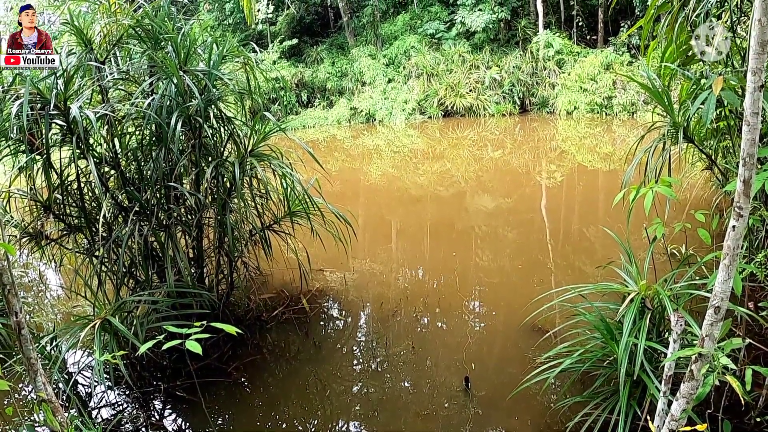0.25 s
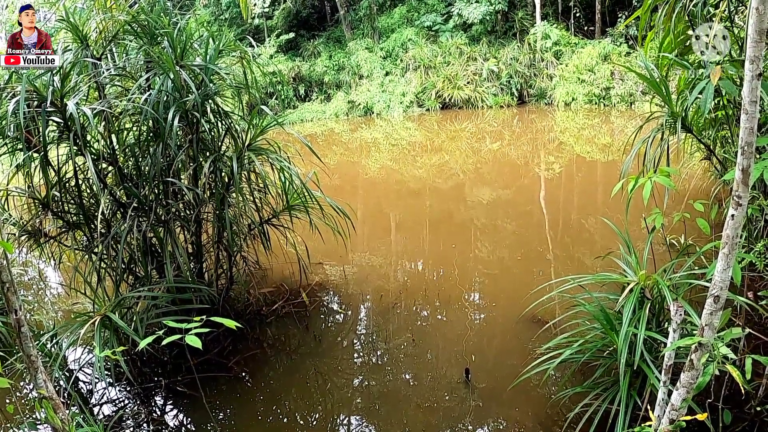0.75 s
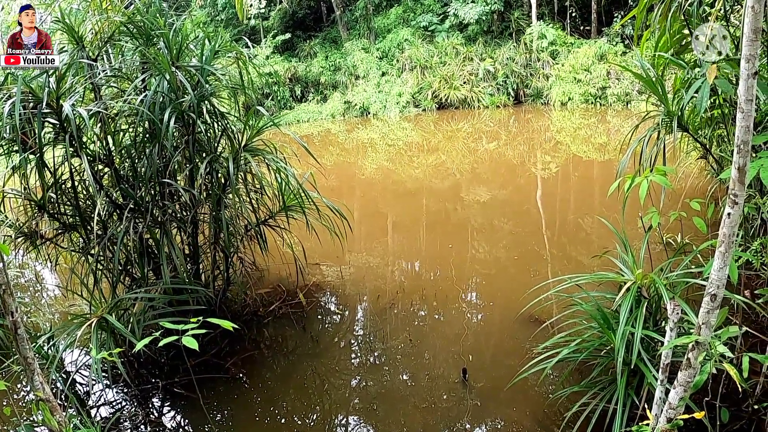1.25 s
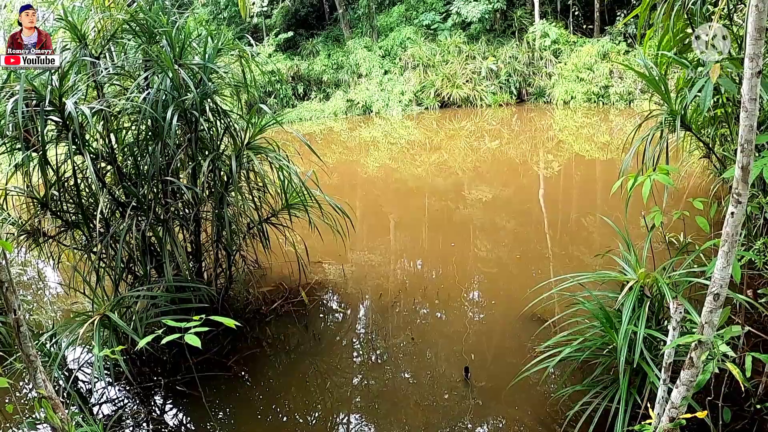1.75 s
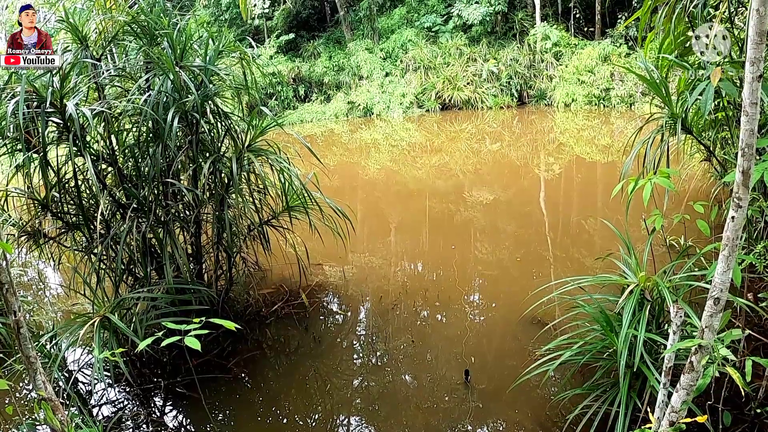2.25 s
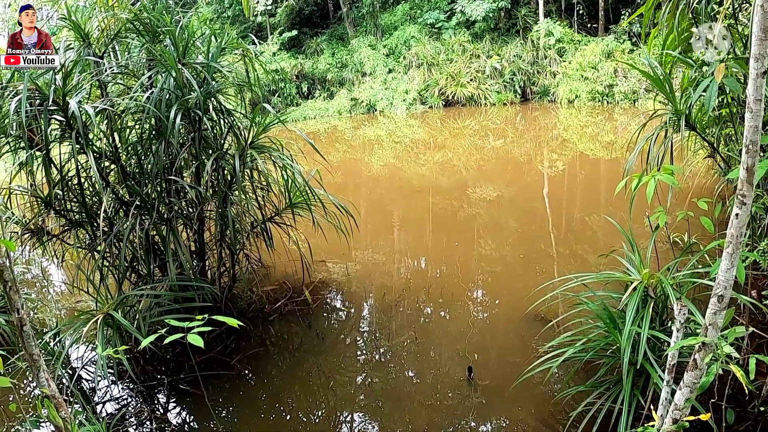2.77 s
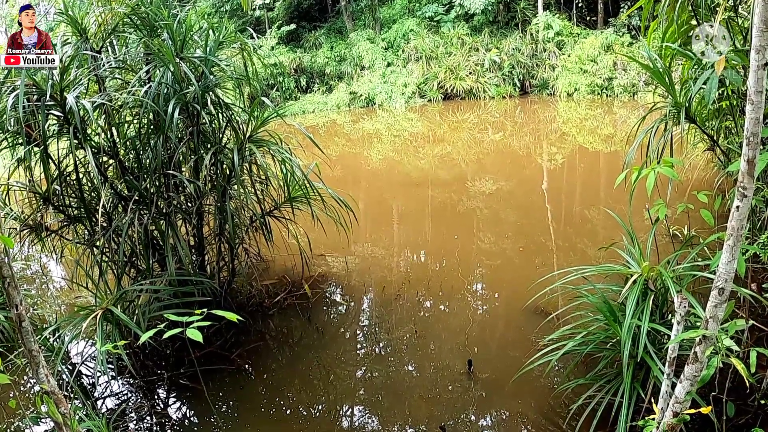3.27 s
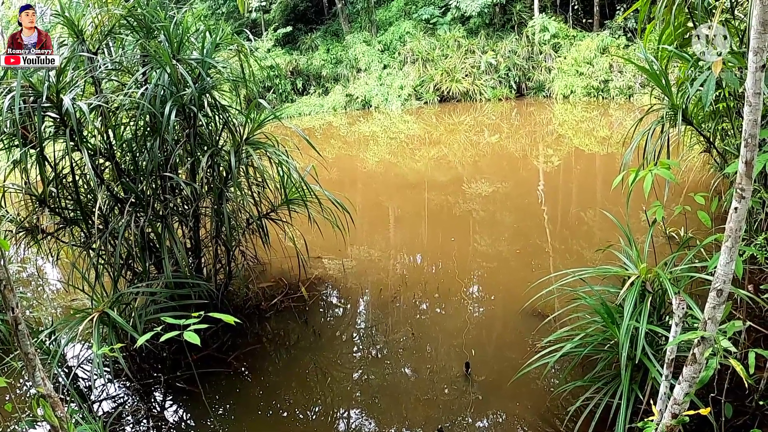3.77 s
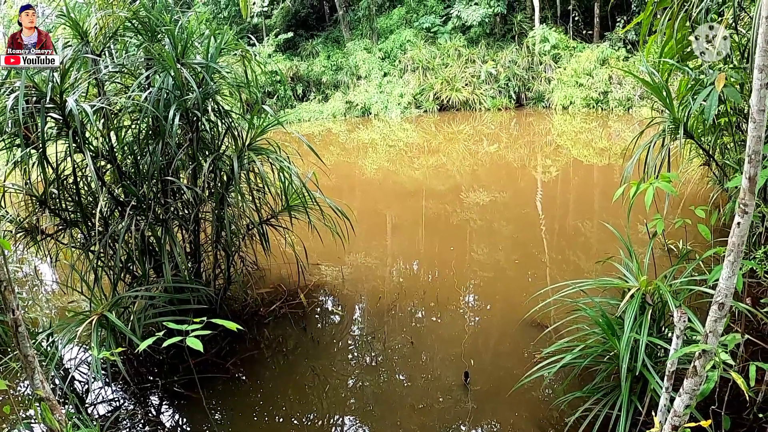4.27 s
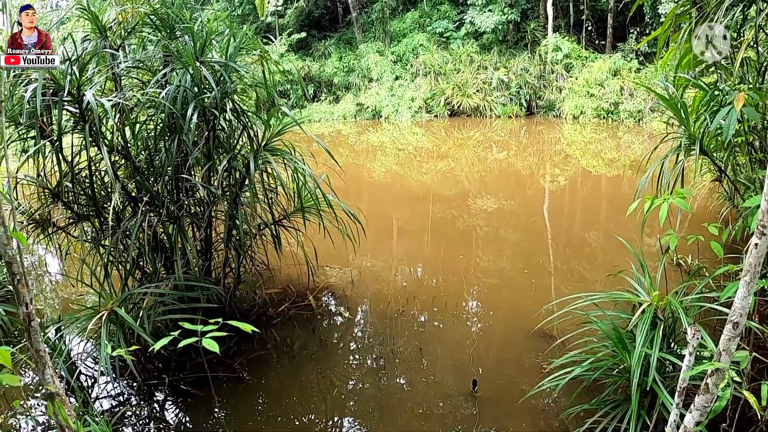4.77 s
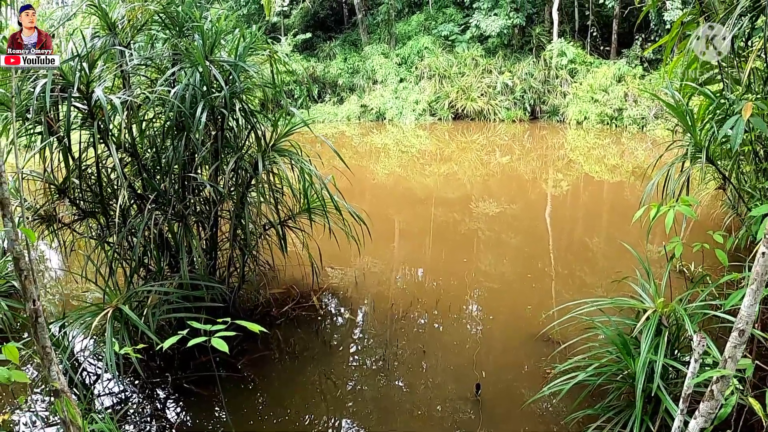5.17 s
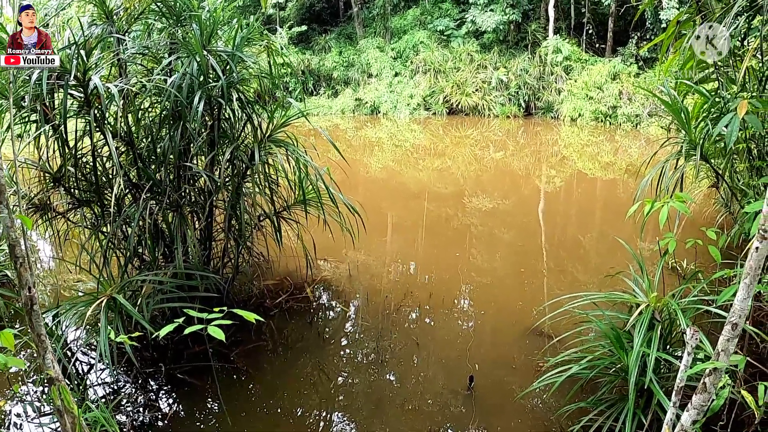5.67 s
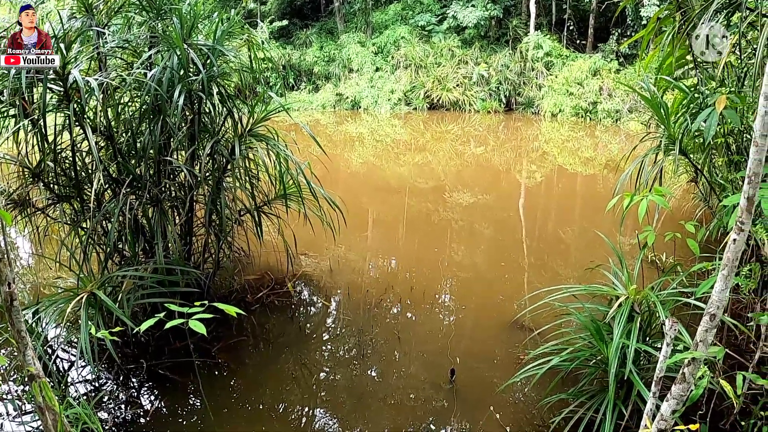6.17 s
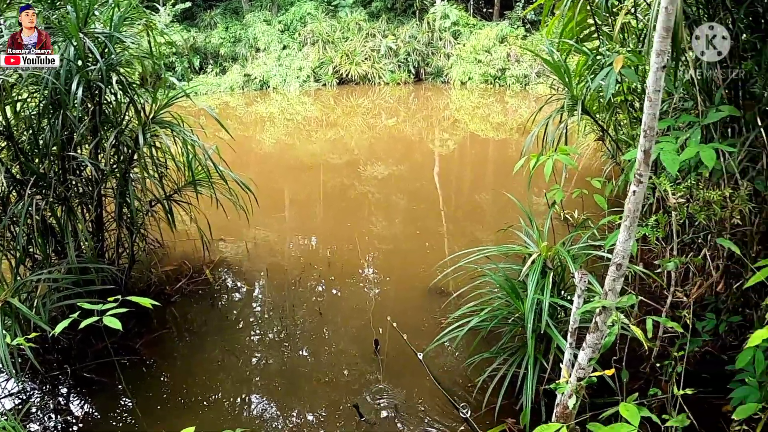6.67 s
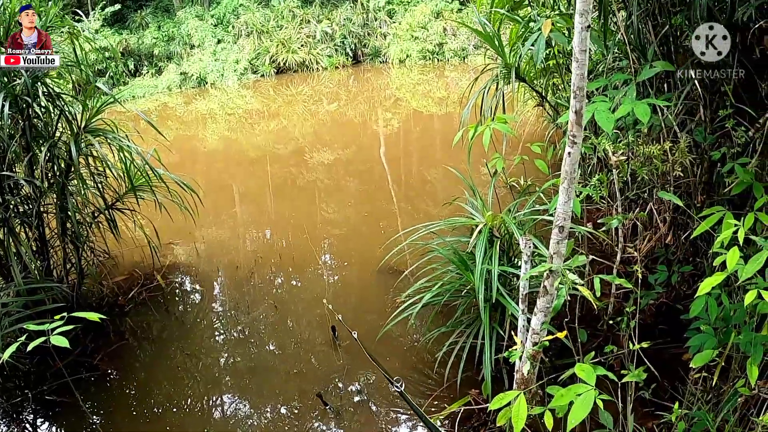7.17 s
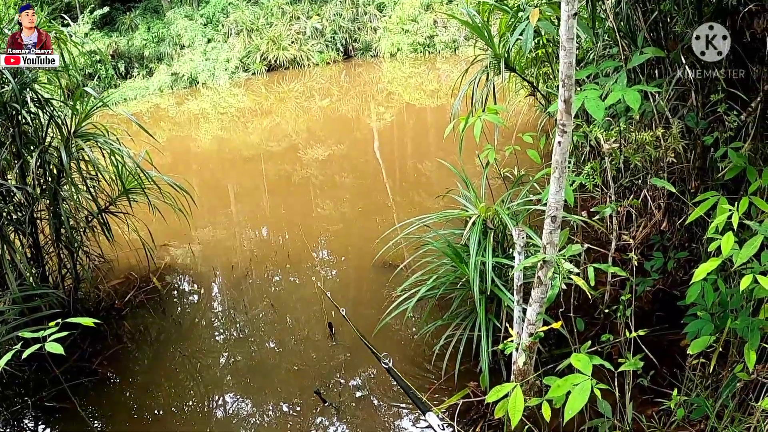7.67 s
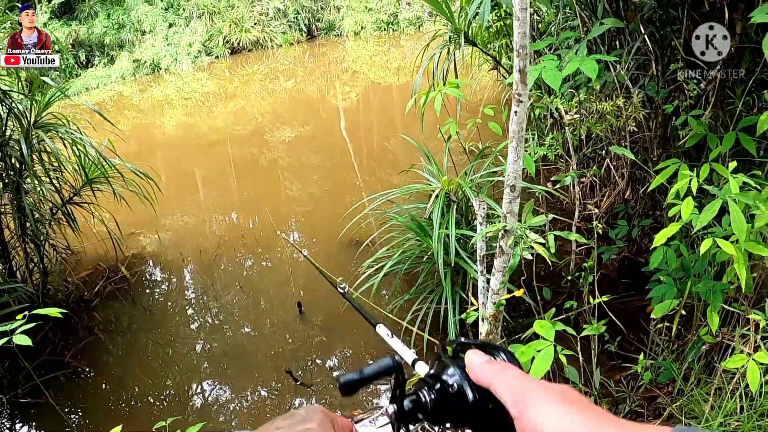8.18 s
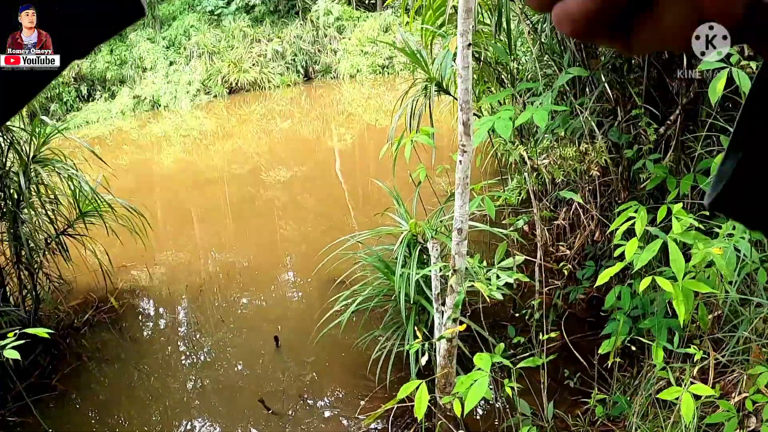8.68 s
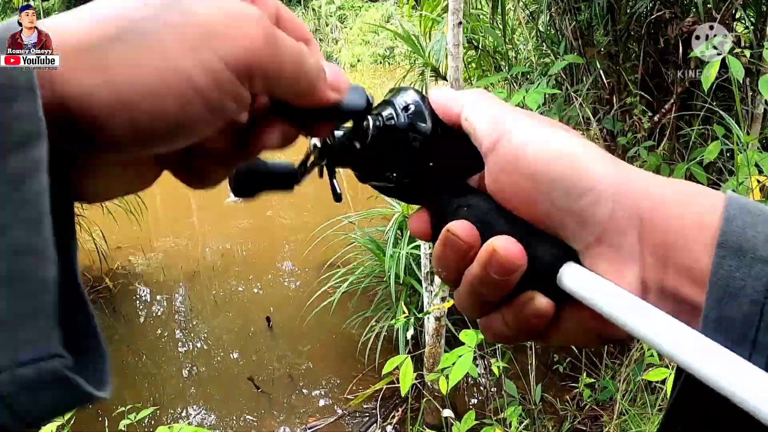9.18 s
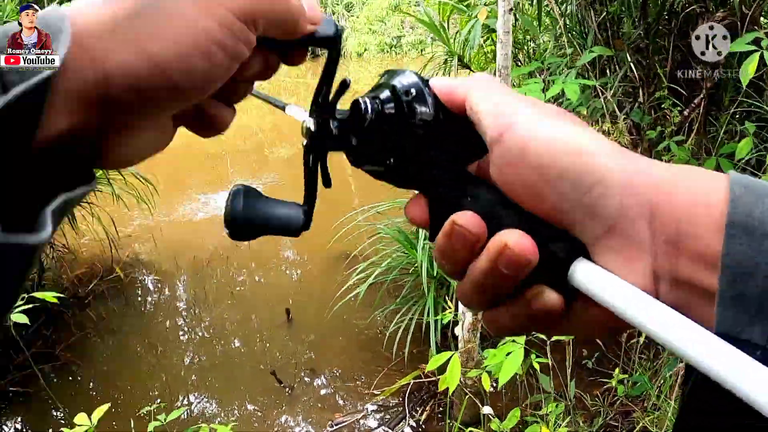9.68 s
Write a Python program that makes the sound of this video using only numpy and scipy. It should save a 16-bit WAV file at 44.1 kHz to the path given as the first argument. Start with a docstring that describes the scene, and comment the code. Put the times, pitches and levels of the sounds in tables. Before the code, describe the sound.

Throughout, crickets and bush crickets shrill in a continuous, very high chorus, pure pulsing tones and fine hiss spread wide over soft forest air. From 0.2 to 1.1 s faint gliding whistles and short squeaks sound nearby, with a light rustle. Between 1.1 and 2 s steps brush and snap dry twigs, the sharpest at 1.9 s on the left. Soft hissing swells and wavering tones echo faintly until about 4 s. Squeaks slow into tiny rattles at 4.6-5.2 s; rustling follows around 6.3 s, a third squeaky run at 6.9-7.5 s, and a twig snap at 7.4 s. From 8.2 s a reel runs quietly with small clicks. At 8.75 s the line is cast, whirring and swishing until 9.3 s; then winding surges close up, with loud sharp clicks, rubbing sleeves, low handling rumble and gulping, bubbling water to the end.

```python
"""Forest pond with a cast line

Crickets and bush crickets shrill without pause in the vegetation round a forest pond: pure tones and noise bands.
Nearby, a few thin gliding whistles and three runs of short squeaks, which are slowing pulse trains that ring resonances.
Soft hissing swells and thin wavering tones come and go in a long echo.
Rustles, dull thumps and a short scrape are made of noise grains; an angler's steps snap twigs.
At the end a line is cast and wound in close to the microphone: the spool whirrs through its housing,
sleeves rub, the reel clicks sharply and the lure gurgles with gliding gulps and clouds of bubbles."""
import sys
import numpy as np
from scipy import signal
from scipy.fft import rfft, irfft, next_fast_len
from scipy.io import wavfile
from scipy.ndimage import map_coordinates

SR = 44100
rng = np.random.default_rng(int(sys.argv[2]) if len(sys.argv) > 2 else 0)


def digitize_waveform(pressure):
    """Quantize a signal to 16-bit integers and store it at the path in sys.argv[1].

    Rows of a 2-D input are taken as channels; values are limited to [-1, 1].
    """
    field = np.atleast_2d(pressure).T
    bounded = np.clip(field, -1, 1)
    quanta = np.round(bounded * 32767).astype(np.int16)
    wavfile.write(sys.argv[1], SR, quanta)


N = 437913
TIME = np.arange(N) / SR


def from_db(db):
    """Decibels to gain."""
    return 10 ** (np.asarray(db) / 20)


def rms_one(x):
    """Scale to unit power."""
    return x / np.sqrt(np.mean(x ** 2) + 1e-20)


def in_time(rows):
    """Columns of a curve table, interpolated at every sample."""
    s, *columns = np.transpose(rows)
    return [np.interp(TIME, s, column) for column in columns]


def during(rows, fade_s=0.048):
    """Fade in from the first row of a curve table."""
    return np.clip((TIME - rows[0][0]) / fade_s, 0, 1)


def held(start_s, end_s, attack_s, release_s):
    """Envelope that rises, holds and has died away at end_s."""
    rise = np.clip((TIME - start_s) / attack_s, 0, 1)
    fall = np.clip((end_s - TIME) / release_s, 0, 1)
    return rise * fall


def swell(length):
    """Time round the middle of a sound and its bell envelope, which spans twice the nominal length."""
    t = np.arange(-length, length, 1 / SR)
    return t, np.cos(np.pi / 2 * t / length) ** 4


def panned(left_db):
    """Gains of the two channels; positive leans left."""
    return from_db(np.array([[.5], [-.5]]) * left_db)


def add(out, sound, s):
    """Mix a sound in from time s, cut at both ends of the scene."""
    at = round(s * SR)
    sound, at = sound[..., max(-at, 0):], max(at, 0)
    out[..., at:at + sound.shape[-1]] += sound[..., :max(N - at, 0)]


def drift(rate, t=TIME):
    """Slow random wander of rms 1, with rate new values per second."""
    knots = rng.standard_normal(8000)
    return rms_one(np.interp((t - t[0]) * rate, np.arange(len(knots)), knots))


def stereo_noise(alike, size=N):
    """White noise whose channels share a part."""
    mid, side = rng.standard_normal((2, size))
    alike = np.clip(alike, 0, 1)
    return np.sqrt((1 + alike) / 2) * mid + np.sqrt((1 - alike) / 2) * np.array([side, -side])


def band(x, low_hz, high_hz, order=2):
    """Butterworth band-pass."""
    edges = [low_hz, min(high_hz, SR * .45)]
    return signal.sosfilt(signal.butter(order, edges, "band", fs=SR, output="sos"), x)


def coloured(x, spectrum):
    """Give a steady sound a spectrum; rms 1."""
    hz, db = np.transpose(spectrum)
    size = next_fast_len(N)
    bins = np.maximum(np.fft.rfftfreq(size, 1 / SR), 1)
    gains = from_db(np.interp(np.log(bins), np.log(hz), db))
    return rms_one(irfft(rfft(x, size) * gains, size)[..., :N])


def resonate(x, modes):
    """Parallel two-pole resonances, with alternating signs."""
    out = 0
    for k, (hz, width, db) in enumerate(modes):
        r = np.exp(-np.pi * width / SR)
        gain = (-1) ** k * from_db(db) * (1 - r * r) / 2
        poles = [1, -2 * r * np.cos(2 * np.pi * hz / SR), r * r]
        out = out + gain * signal.lfilter([1, 0, -1], poles, x)
    return out


def forest(x, t60=0.65, first_s=0.023):
    """Scattering from trunks and leaves: a diffuse tail, different in each ear."""
    t = np.arange(SR) / SR
    tail = rng.standard_normal((2, SR)) * from_db(-60 * t / t60) * (t > first_s)
    tail /= np.sqrt(np.sum(tail ** 2, axis=1, keepdims=True))
    return signal.fftconvolve(np.atleast_2d(x), tail, axes=1)[:, :N]


def glides(rows, waver_hz, flutter_db, waver_rate=160):
    """Brief tones that waver in pitch and level and glide, with the end pitches half a length from the middle."""
    out = np.zeros(N)
    for s, length, start_hz, end_hz, db in rows:
        t, envelope = swell(length)
        hz = start_hz * (end_hz / start_hz) ** (t / length + .5) + waver_hz * drift(waver_rate, t)
        tone = np.sin(2 * np.pi * np.cumsum(hz) / SR) * from_db(flutter_db * drift(70.2, t))
        add(out, from_db(db) * envelope * rms_one(tone), s - length)
    return out


# still forest air all round, relative spectrum: [f/Hz, density level/dB per Hz]
AIR_SPECTRUM = [(25, -17.5), (50, -9.5), (105, -21), (150, 0), (200, -2.5), (300, -7), (650, -15.5),
                (1150, -14), (1700, -17), (2400, -22.5), (4200, -25), (8000, -43.5), (10000, -65.5)]
AIR_DB = -65.5


def forest_air():
    """Wide noise with the colour of still air, its level wavering slightly."""
    return from_db(AIR_DB + .5 * drift(6.4)) * coloured(stereo_noise(0.13), AIR_SPECTRUM)


# farther singers round the pond, the last group a steady hiss:
# [centre f/Hz, width f/Hz, level/dB, left-right level/dB, syllables per s, pulsing depth 0-1]
CHORUS_GROUPS = [(5423, 990, -70.5, 3, 5.3, 0.03), (6790, 480, -72, 6.5, 20, 0.5),
                 (7259, 195, -61.5, 5, 79, 0.12), (7656, 490, -60, -0.5, 25, 0.08),
                 (8200, 246, -67, -7.5, 19.3, 0.34), (8504, 297, -71.5, -7, 120, 0.4),
                 (6700, 920, -71, 0.5, 51, 0)]


def chorus(waver_db=.5, rate_wander=0.0096):
    """Farther singers as blurred noise bands: most groups pulsing at their own rates, one a steady hiss."""
    out = np.zeros((2, N))
    for hz, width, db, left_db, rate, depth in CHORUS_GROUPS:
        cycle = np.cumsum(rate * (1 + rate_wander * drift(1.4))) / SR
        strokes = np.maximum(1 + depth * np.cos(2 * np.pi * cycle), 0)
        wings = band(rng.standard_normal((2, N)), hz - width / 2, hz + width / 2, order=3)
        out += from_db(db + waver_db * drift(3.4)) * panned(left_db) * rms_one(wings * strokes)
    return out


def wing_song(hz, rate, first_s, duty=0.65, waver_hz=7, rough=0.12, wet_db=-13):
    """Each closing of the wings rings one pure tone; the foliage fills the gaps."""
    cycle = ((TIME - first_s) * rate + .5) % 1 - .5
    stroke = np.cos(np.pi * np.clip(cycle / duty, -.5, .5))
    tone = np.sin(2 * np.pi * np.cumsum(hz + waver_hz * drift(40)) / SR)
    song = rms_one(stroke * tone * (1 + rough * drift(300)) * from_db(1.1 * drift(17)))
    return song + from_db(wet_db) * forest(song)


# the nearest cricket, which lies to the left while the microphone is turned away:
# [t/s, level/dB, left-right level/dB]
NEAREST_CRICKET = [(0.0, -62.5, -2.5), (3.0, -59.5, -1), (3.9, -61.5, -6), (4.5, -62.5, 13),
                   (5.1, -60, 11.5), (6.0, -65, 17), (8.2, -62, 8), (8.7, -64, 0)]
# songs of the two near crickets: (wing tone f/Hz, syllables per s, middle of the first syllable t/s)
NEAR_SONG, SECOND_SONG = (7143, 11.955, .012), (7628, 12.71, .055)
SECOND_DB, SECOND_LEFT_DB = -67.5, -5.5


def crickets():
    """Two near crickets sing at slightly different rates; the nearest changes in level and side."""
    level_db, left_db = in_time(NEAREST_CRICKET)
    nearest = from_db(level_db) * panned(left_db) * wing_song(*NEAR_SONG)
    second = from_db(SECOND_DB) * panned(SECOND_LEFT_DB) * wing_song(*SECOND_SONG)
    return nearest + second


# soft hissing swells and thin wavering tones; levels before the direct and echo gains:
# [middle t/s, length t/s, start f/Hz, end f/Hz, level/dB, waver f/Hz]
SOFT_SWELLS = [(0.028, 0.2, 3350, 3250, -73.5, 202), (1.42, 0.34, 4150, 3500, -68, 330),
               (2.05, 0.31, 1011, 919, -69, 90), (2.55, 0.5, 1836, 1780, -73.5, 120),
               (2.679, 0.63, 3190, 3080, -74.5, 169), (3.169, 0.15, 1416, 1200, -69, 111),
               (3.65, 0.6, 1320, 1360, -74, 100), (3.721, 0.65, 3194, 3154, -65.5, 219),
               (6.98, .2, 3650, 3250, -68, 200), (7.276, 0.5, 2910, 2790, -63.5, 140),
               (7.3, 0.85, 4440, 4170, -71, 85), (8.519, 0.41, 3500, 3220, -59, 150)]


def soft_swells(direct_db=-6, wet_db=-1.5):
    """Soft hissing swells and thin wavering tones, blurred by echo."""
    out = np.zeros(N)
    for *tone, waver in SOFT_SWELLS:
        out += glides([tone], waver_hz=waver, flutter_db=3.5, waver_rate=500)
    return from_db(direct_db) * out + from_db(wet_db) * forest(out, t60=0.52)


# thin whistles nearby: [middle t/s, length t/s, start f/Hz, end f/Hz, level/dB]
THIN_WHISTLES = [(.19, 0.15, 1197, 1160, -73.5), (0.41, 0.074, 1800, 1200, -63.5),
                 (0.592, 0.075, 1216, 1205, -61), (0.698, 0.085, 1220, 1195, -62.5),
                 (0.925, 0.1, 1230, 1170, -67), (5.56, 0.25, 1175, 1196, -70)]


def whistles(wet_db=-9):
    """Faint gliding whistles, blurred by the trees."""
    out = glides(THIN_WHISTLES, waver_hz=24, flutter_db=3.0)
    return out + from_db(wet_db) * forest(out)


# squeaks nearby; the pulse rates hold half a length before and after the middle:
# [middle t/s, length t/s, level/dB, first pulse rate f/Hz, last pulse rate f/Hz]
SQUEAK_RUNS = [(0.764, .036, -59.5, 1120, 930), (.958, .024, -58.5, 930, 822),
               (1.13, .018, -54.5, 600, 469), (4.612, 0.027, -61, 1053, 920),
               (4.725, .014, -61, 1230, 1120), (4.779, .023, -51.5, 1250, 620),
               (4.894, .016, -52, 904, 328), (4.942, .016, -47, 900, 331), (5.083, 0.019, -50.5, 697, 251),
               (5.137, .013, -47, 643, 270), (5.150, 0.0084, -49.5, 654, 503),
               (6.894, .022, -54, 1063, 880), (7.012, .016, -54, 1003, 401),
               (7.063, .016, -46.5, 1200, 480), (7.205, .019, -51, 747, 160),
               (7.256, .013, -44.5, 900, 299), (7.31, 0.019, -53.5, 984, 933),
               (7.457, .017, -48.5, 520, 150), (7.526, .023, -49.5, 480, 105)]
# what the squeaks ring with, before sinking and dulling: [f/Hz, width f/Hz, level/dB]
SQUEAK_RESONANCES = [(1090, 220, 4), (1580, 340, 4), (1910, 300, 2), (2480, 390, 0.5), (3100, 420, 1.5)]


def squeaks(sag=0.06, dulling_db=3.5, soft_db=3.5, soft_hz=900, last_pulse=.4, jitter=0.09,
            shimmer_db=2.5, wet_db=-4.0):
    """Pulses slow from a soft tone into a sharp, uneven rattle; their resonances sink and grow duller."""
    out, ring = np.zeros(N), np.arange(SR // 100) / SR
    mode_hz, width, mode_db = np.transpose(SQUEAK_RESONANCES)[:, :, None]
    signs = (-1) ** np.arange(len(mode_hz))[:, None]
    octaves_squared = np.log2(mode_hz / mode_hz[0]) ** 2
    for s, length, db, start_hz, end_hz in SQUEAK_RUNS:
        t, _ = swell(length)
        along = t / length
        rate = start_hz * (end_hz / start_hz) ** (along + .5)
        tonal = np.minimum(rate / soft_hz, 1) ** 2
        cycles = np.cumsum(rate * (1 + jitter * (1 - tonal / 2) * drift(500, t))) / SR
        cycles -= np.interp(last_pulse, along, cycles)  # a pulse falls exactly here
        envelope = np.exp(-np.abs(2 * along) ** 3)
        voice = np.zeros(len(t) + len(ring))
        for i in np.flatnonzero(np.diff(np.floor(cycles))):
            tilt_db = (dulling_db * along[i] + soft_db * tonal[i]) * octaves_squared
            gains = signs * from_db(mode_db - tilt_db + shimmer_db * rng.normal(size=mode_hz.shape))
            sunk_hz = mode_hz * np.exp(-sag * along[i])
            modes = gains * np.exp(-np.pi * width * ring) * np.sin(2 * np.pi * sunk_hz * ring)
            voice[i:i + len(ring)] += envelope[i] * modes.sum(axis=0)
        voice = band(voice, 980, 3900, order=5)
        even_power = np.sqrt(np.sum(envelope ** 2) / np.sum(voice ** 2))
        add(out, from_db(db) * voice * even_power, s - length)
    return out + from_db(wet_db) * forest(out, t60=0.6, first_s=0.0031)


# brushing rustles, dull thumps and a short scrape: [middle t/s, length t/s, level/dB, brightest f/Hz]
RUSTLES = [(0.398, 0.019, -58.5, 440), (0.411, 0.05, -64, 2800), (0.901, 0.17, -67.5, 2120),
           (1.107, 0.012, -53.5, 1150), (1.112, 0.073, -59.5, 2200), (1.786, 0.14, -68, 1750),
           (1.932, 0.089, -55, 1980), (5.275, 0.29, -66.5, 665), (6.3, 0.094, -60.5, 2130),
           (6.343, 0.063, -55.5, 4250), (6.42, 0.16, -63, 2600), (6.73, 0.27, -65.5, 1480),
           (7.1, 0.15, -69, 300), (8.35, 0.26, -61, 1950), (8.623, 0.096, -60, 2900),
           (8.8, 0.022, -43.5, 1920), (9.294, 0.013, -32, 1910)]


def rustles(grain_db=2.5, spread=2.27, top_hz=10000):
    """Brushing rustles, dull thumps and a short scrape, made of clumped noise grains."""
    out, clumps = np.zeros((2, N)), from_db(grain_db * drift(350))
    for s, length, db, hz in RUSTLES:
        t, envelope = swell(length)
        grains = stereo_noise(0.73, size=len(t)) * np.interp(s + t, TIME, clumps)
        rustle = rms_one(band(grains, hz / spread, hz * spread))
        add(out, from_db(db) * envelope * rustle, s - length)
    return band(out, 100, top_hz)


# what a snap rings with, before scatter and damping: [multiple of its ring f, level/dB, t60 t/s]
SNAP_MODES = [(.45, -36, 0.0019), (1, 9, 0.009), (1.132, 5.5, 0.009), (1.48, 10.5, 0.0055),
              (2.1, -10, 0.0053), (2.55, -1, 0.01)]


def snap(hz, damping, crack_db, crack_top_hz, mode_scatter_db=3, ear_scatter_db=3.0):
    """A sudden release: a brief crack and a few quickly dying modes; peak 1."""
    t = np.arange(1024) / SR
    crack = band(stereo_noise(0.095, size=len(t)) * np.exp(-t / 0.0018), 1640, crack_top_hz, order=4)
    out = from_db(crack_db) * panned(-6) * crack
    for multiple, db, t60 in SNAP_MODES:
        ear_db = ear_scatter_db * rng.normal(size=(2, 1))
        strength = from_db(db + mode_scatter_db * rng.normal() + ear_db)
        decay = from_db(-60 * t * damping / t60)
        out = out + strength * np.sin(2 * np.pi * hz * multiple * t) * decay
    # the contact chatters briefly, which flattens the first cycles
    out = band(np.tanh(3.2 * out / np.abs(out).max()), 800, crack_top_hz)
    return out / np.abs(out).max()


# twigs snapping, peak level before panning: [t/s, level/dB, left-right level/dB]
TWIG_SNAPS = [(1.105, -48, 3), (1.528, -48.5, 8), (1.575, -50, 6), (1.755, -50, 8), (1.786, -44.5, 11),
              (1.900, -33.5, 17.5), (1.976, -42, 6), (7.409, -39.5, 2), (7.412, -38.5, 1)]
TWIG_HZ = 1930  # typical ring


def twigs(wet_db=-9):
    """Small dry twigs break underfoot, each snap with its own pitch."""
    out = np.zeros((2, N))
    for s, db, left_db in TWIG_SNAPS:
        hz = TWIG_HZ * np.exp(0.11 * rng.normal())
        twig = snap(hz, damping=1.27, crack_db=-21, crack_top_hz=3820)
        add(out, from_db(db) * panned(left_db) * twig, s)
    return out + from_db(wet_db) * forest(out, t60=0.39)


# sleeves moving by the microphone, rubbing before its lift: [t/s, rubbing level/dB, rumble level/dB]
SLEEVE_MOVES = [(8.72, -58, -65), (8.85, -56.5, -63.5), (9.16, -57, -59.5), (9.27, -53, -65.5),
                (9.4, -48, -48.5), (9.6, -44.5, -45.5), (9.72, -42.5, -57), (9.87, -48, -50),
                (9.93, -53.5, -56)]
# relative spectrum of the rubbing cloth: [f/Hz, density level/dB per Hz]
CLOTH_SPECTRUM = [(100, -14.5), (350, -3.5), (750, -13.5), (1100, 0), (1650, -3.5), (2200, -12),
                  (5000, -12.5), (8500, -21.5), (10000, -22.5), (14000, -30), (15500, -57)]
# relative spectrum of the shaken microphone body: [f/Hz, density level/dB per Hz]
RUMBLE_SPECTRUM = [(20, -1), (55, 3), (90, -2.5), (140, 5), (260, -9), (600, -7), (2000, -64)]


def sleeves(rub_lift_db=3, grain_db=3):
    """Cloth catches and slips in grains, and shakes the microphone's body."""
    rub_db, shake_db = in_time(SLEEVE_MOVES)
    cloth = coloured(stereo_noise(0.67) * from_db(grain_db * drift(220)), CLOTH_SPECTRUM)
    rumble = coloured(stereo_noise(0.93), RUMBLE_SPECTRUM) * panned(-3.5)
    return during(SLEEVE_MOVES) * (from_db(rub_db + rub_lift_db) * cloth + from_db(shake_db) * rumble)


# the rod is swung and the line runs out:
# [middle t/s, length t/s, start f/Hz, end f/Hz, level/dB, waver f/Hz]
ROD_AND_LINE = [(8.362, 0.22, 1500, 1080, -64.5, 170), (8.702, 0.048, 1100, 1700, -67, 90),
                (8.86, .18, 2830, 2730, -52, 70), (9.083, .05, 2620, 2680, -48.5, 170),
                (9.195, .09, 2540, 2660, -51, 120), (9.16, .22, 3320, 3290, -54, 70),
                (8.982, .18, 1130, 1038, -51.5, 45.3), (9.114, 0.051, 1040, 1040, -47, 35),
                (9.129, 0.12, 1520, 1626, -56, 90), (9.195, 0.1, 1460, 1100, -46, 110)]


def line_swishes(wet_db=-12):
    """Rod and line in motion: narrow whines and broad, gliding swishes."""
    out = np.zeros(N)
    for *swish, waver in ROD_AND_LINE:
        out += glides([swish], waver_hz=waver, flutter_db=4, waver_rate=700)
    return out + from_db(wet_db) * forest(out, t60=0.17, first_s=0.0065)


# resonances of the reel's housing: [f/Hz, width f/Hz, level/dB]
HOUSING_MODES = [(1063, 180, -0.5), (1480, 240, -1.5), (2340, 440, -0.5), (2830, 230, 4.5), (3240, 150, 4),
                 (3670, 380, 5), (4170, 620, 1.5), (5400, 670, -34)]
# before the cast the reel runs quietly as the slack is taken up
SLACK_S, SLACK_FADE_S, SLACK_DB = 8.2, 0.2, -62.5
# the cast: the spool spins freely until it is braked
CAST_S, BRAKE_S, SPIN_UP_S, BRAKING_S = 8.748, 9.283, 0.033, 0.055
CAST_DB, CAST_KNOCKS_PER_S = -47, 260
# winding in: the gears surge once in each turn of the handle
WIND_S, FIRST_PUSH_S, TURNS_PER_S = 9.285, 9.31, 3.47
WIND_DB, SURGE_DB, WIND_KNOCKS_PER_S = -49, 5, 420


def reel_gears(friction=0.69, wobble=.2, rattle_db=2.3):
    """Knocks and friction drive the housing: softly at first, evenly in the cast, in surges while winding."""
    slack = from_db(SLACK_DB) * held(SLACK_S, CAST_S + SLACK_FADE_S, SLACK_FADE_S, SLACK_FADE_S)
    cast = from_db(CAST_DB) * held(CAST_S, BRAKE_S, SPIN_UP_S, BRAKING_S)
    push = np.cos(2 * np.pi * TURNS_PER_S * (TIME - FIRST_PUSH_S))
    winding = from_db(WIND_DB + SURGE_DB * push) * np.clip((TIME - WIND_S) / SPIN_UP_S, 0, 1)
    rate = np.where(TIME < WIND_S, CAST_KNOCKS_PER_S, WIND_KNOCKS_PER_S)
    knock_count = np.cumsum(rate * (1 + wobble * drift(170))) / SR
    knocks = np.diff(np.floor(knock_count), prepend=0)
    uneven_knocks = rms_one(knocks * from_db(5.3 * np.tanh(drift(400))))
    drive = uneven_knocks + friction * stereo_noise(0.44)
    whirr = rms_one(band(resonate(drive, HOUSING_MODES), 870, 5400, order=3))
    return (slack + cast + winding) * from_db(rattle_db * drift(110)) * whirr


# clicks of the reel, timed at the catch, peak level: [t/s, level/dB, ring f/Hz]
CATCH_CLICKS = [(8.5295, -35, 3300), (8.603, -40, 2910), (8.64, -42, 3180), (8.762, -32, 3240),
                (8.858, -27.5, 2920), (8.981, -32, 3080), (8.9977, -23, 3540), (9.1438, -16, 3180),
                (9.293, -19, 2930), (9.3327, -18.5, 3050), (9.419, -10, 3180), (9.447, -25, 3050),
                (9.483, -24, 3020), (9.511, -9.5, 3040), (9.5474, -9.5, 3180), (9.6303, -19, 3230),
                (9.661, -24.5, 3560), (9.729, -24, 2780), (9.7445, -11, 2950), (9.771, -26, 3140),
                (9.823, -11, 2940), (9.857, -25, 3120)]


def reel_clicks(wet_db=-17, travel_s=0.00052):
    """The reel's catch snaps right by the microphone, heard after a short travel time."""
    out = np.zeros((2, N))
    for s, db, hz in CATCH_CLICKS:
        click = snap(hz, damping=0.86, crack_db=7.5, crack_top_hz=9150)
        add(out, from_db(db) * click, s + travel_s)
    return out + from_db(wet_db) * forest(out, t60=0.086, first_s=0.004)


# large bubbles gulp behind the lure: [middle t/s, length t/s, start f/Hz, end f/Hz, level/dB]
LURE_GULPS = [(9.363, .036, 520, 289, -39), (9.414, .03, 520, 700, -36), (9.388, 0.02, 1117, 1170, -42),
              (9.43, .03, 1150, 945, -39.5), (9.512, .052, 511, 270, -34.5),
              (9.585, 0.061, 210.3, 479, -40.5), (9.584, .014, 1525, 1680, -33.5),
              (9.63, 0.064, 120, 289, -42.5), (9.651, 0.017, 990, 1120, -32), (9.69, 0.025, 428, 380, -41),
              (9.695, 0.025, 250, 238, -37.5), (9.734, 0.026, 516, 530, -38.5),
              (9.805, 0.022, 1110, 1150, -39.5)]


def gurgle(bubbles_db=-40.5, low_hz=950, high_hz=1850, churn_db=-46, churn_low_hz=240, churn_high_hz=720,
           cycles=17, rise=0.26, scatter_s=0.03, count=22):
    """Every sweeping gulp of the lure sheds small bubbles and churns up deeper ones, each rising in pitch."""
    out = glides(LURE_GULPS, waver_hz=58, flutter_db=2.8, waver_rate=400)
    t = np.arange(SR // 10) / SR
    small = (bubbles_db, low_hz, high_hz, count)
    deep = (churn_db, churn_low_hz, churn_high_hz, count // 3)
    for db, low, high, number in (small, deep):
        for s, *_ in LURE_GULPS:
            for size, strength in rng.random((number, 2)):
                hz = low * (high / low) ** size
                age = t * hz / cycles  # reaches 1 when the bubble has died by 60 dB
                ringing = np.sin(2 * np.pi * hz * t * (1 + rise * age / 2))
                bubble = ringing * np.exp(-np.log(1000) * age) * (1 - np.exp(-t * hz))
                add(out, from_db(db + 15 * (strength - .5)) * bubble, s + scatter_s * rng.normal())
    return out


def scene(left_lag_s=.00004):
    """Insects and air all round; the other sounds reach the right microphone slightly sooner."""
    background = forest_air() + chorus() + crickets()
    tones = soft_swells() + whistles() * panned(3.5) + squeaks() * panned(2.4)
    movement = rustles() * panned(2.4) + twigs() + sleeves()
    fishing = line_swishes() + reel_gears() + reel_clicks() + gurgle()
    left, right = tones + movement + fishing
    late_left = map_coordinates(left, [np.arange(N) - left_lag_s * SR], order=3)
    return background + np.array([late_left, right])


CUTOFF_HZ = 15600


def record(dry):
    """The top is cut steeply by an elliptic low-pass."""
    return signal.sosfilt(signal.ellip(10, .1, 80, CUTOFF_HZ, fs=SR, output="sos"), dry)


dry = scene()
out = record(dry)
digitize_waveform(out)
```